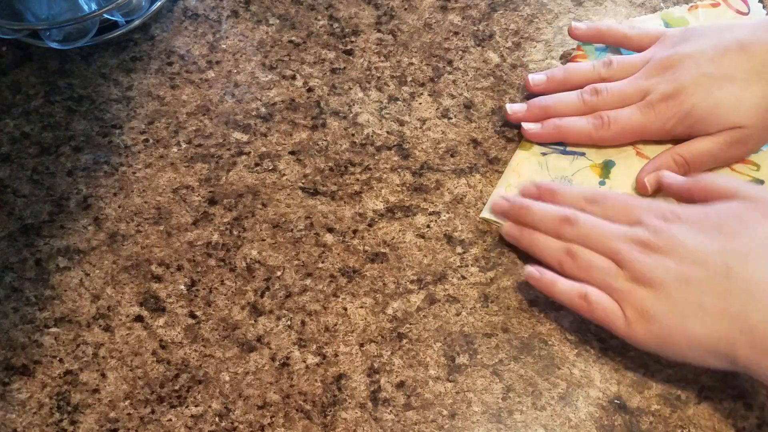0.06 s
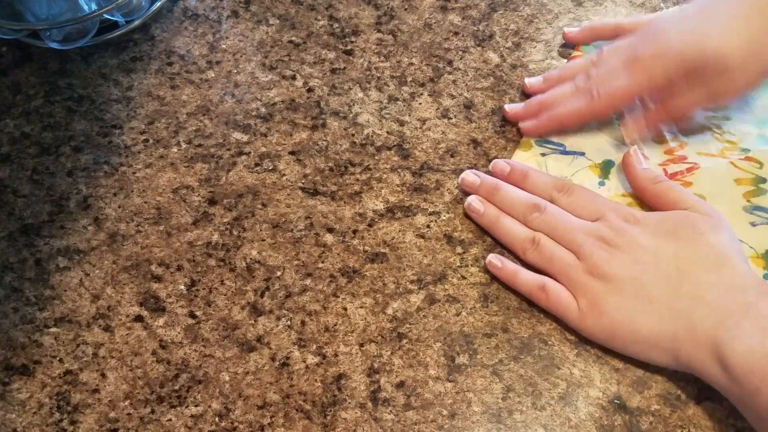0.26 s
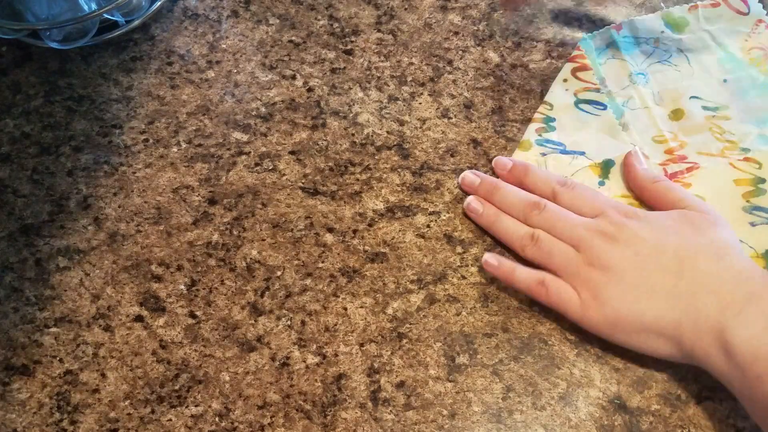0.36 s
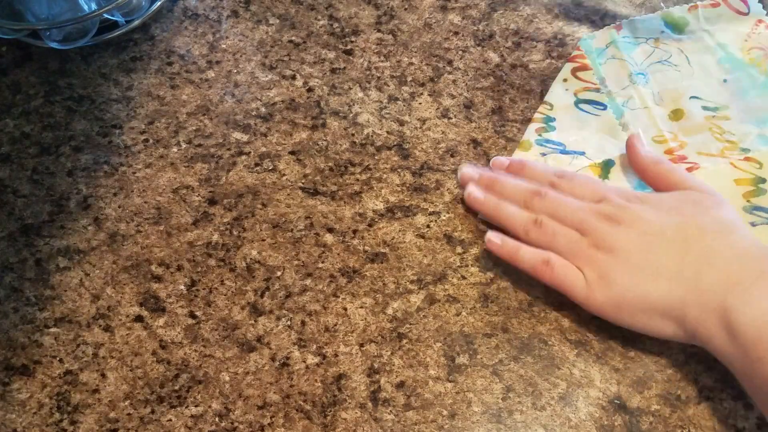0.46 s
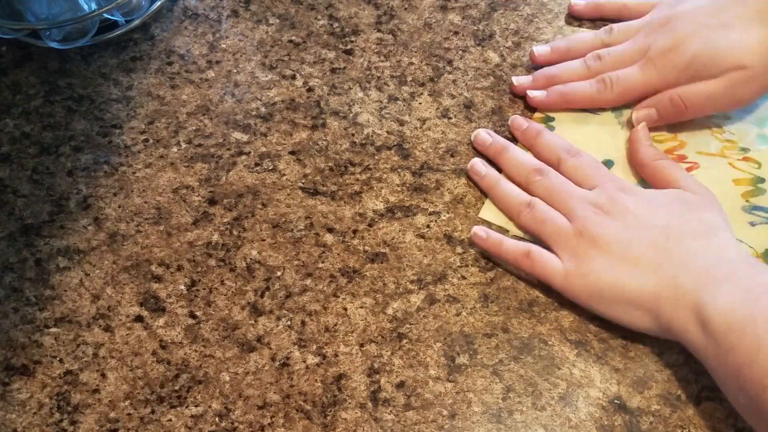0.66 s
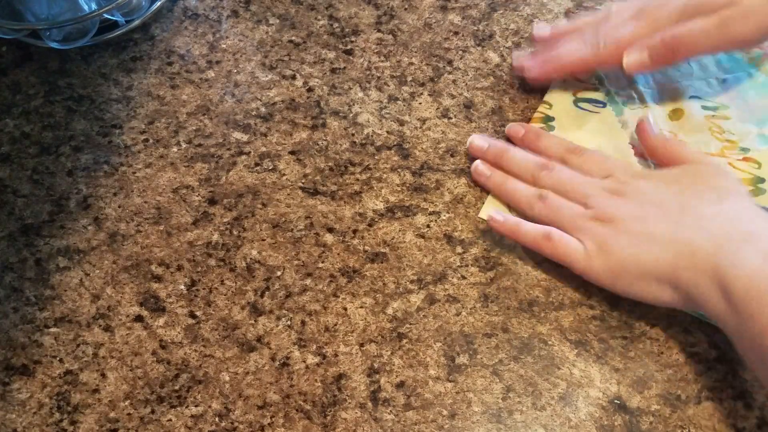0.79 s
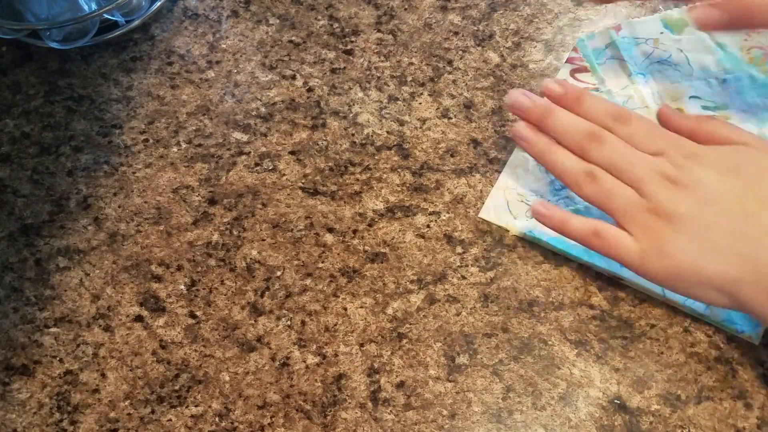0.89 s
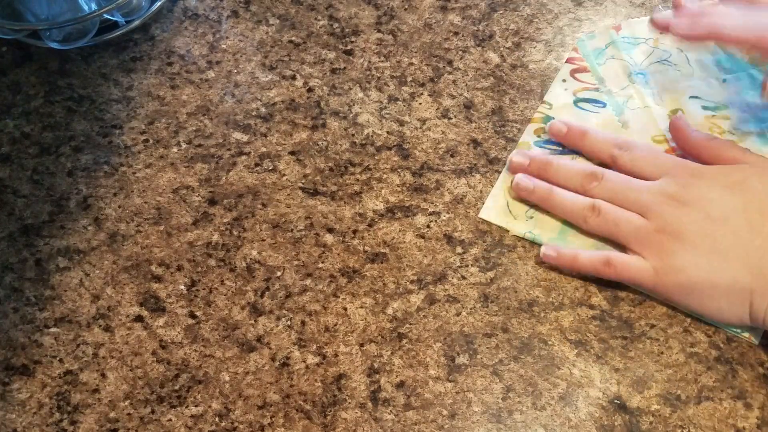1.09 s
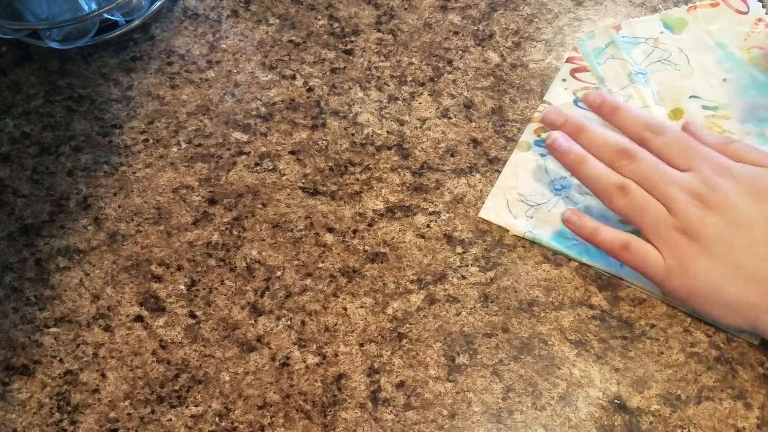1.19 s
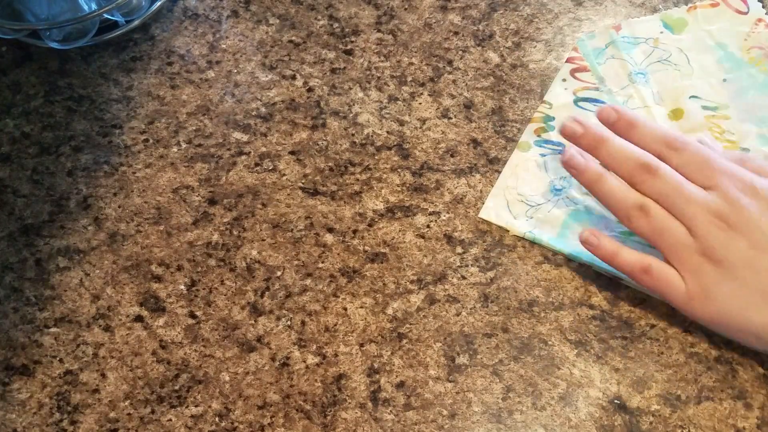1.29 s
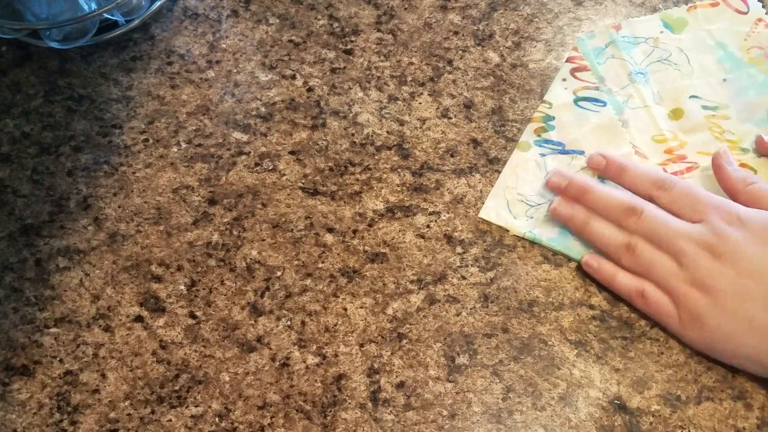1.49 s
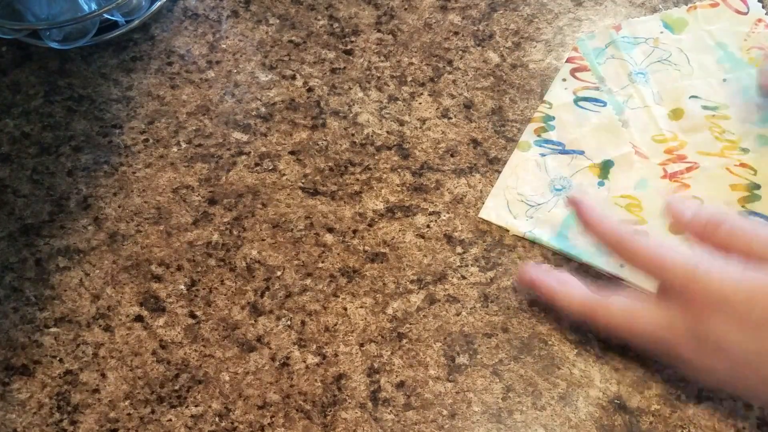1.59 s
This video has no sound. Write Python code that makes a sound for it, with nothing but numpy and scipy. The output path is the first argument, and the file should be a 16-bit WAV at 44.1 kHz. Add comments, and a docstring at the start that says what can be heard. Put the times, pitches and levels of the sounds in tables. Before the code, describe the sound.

A stiff waxed cloth crinkles as hands pat it flat on a kitchen countertop. Four pats each give a short crackle and soft thump, the third firmest, with faint palm slides and ticks between. An appliance hums behind the close sounds.

```python
"""Two hands fold a stiff waxed cloth and pat it flat on a kitchen countertop.
An appliance hums in the small room throughout. First a palm slides and the wax ticks.
Pats follow near 0.2, 0.65, 1.0 and 1.4 s, each crushing the cloth in a short crinkle and thumping
the counter, with ticks and slides between. The third is firmest and carries a brief hollow tone.
A last slide and a fainter hollow tone come near 1.6 s."""
import sys
import numpy as np
from scipy import signal
from scipy.fft import rfft, irfft
from scipy.io import wavfile

SR = 44100
rng = np.random.default_rng(int(sys.argv[2]) if len(sys.argv) > 2 else 0)


def to_wav(sig):
    """Store sig (one row per channel, or 1-D mono) as 16-bit WAV at the path in sys.argv[1].

    Samples outside -1..1 are clipped; the rate is SR.
    """
    pcm = np.clip(np.atleast_2d(sig), -1, 1) * 32767
    pcm = np.round(pcm).astype(np.int16)
    wavfile.write(sys.argv[1], SR, pcm.T)  # frames by channels


N = 72765


def amp(db):
    """dB to gain."""
    return 10 ** (np.asarray(db) / 20)


def unit(x):
    """Scale to rms 1."""
    return x / np.sqrt(np.mean(x ** 2) + 1e-20)


def curve(points, hz):
    """Interpolate a table over log frequency."""
    points_hz, values = np.transpose(points)
    return np.interp(np.log(hz + 1), np.log(points_hz + 1), values)


def since(start_s):
    """Seconds since start_s, zero before."""
    return np.maximum(np.arange(N) / SR - start_s, 0)


def bins_hz():
    """Full-length FFT frequencies."""
    return np.fft.rfftfreq(N, 1 / SR)


def pan(db):
    """Stereo gains for an L-R level difference."""
    return amp(np.array([[db], [-db]]) / 2)


def colour(pair, spectrum_db, coherence):
    """Give two independent signals a spectrum and L/R coherence, at rms 1."""
    left, other = rfft(pair)
    shared = np.clip(curve(coherence, bins_hz()), -1, 1)
    right = shared * left + np.sqrt(1 - shared ** 2) * other
    return unit(irfft(np.array([left, right]) * amp(spectrum_db), N))


def tilt(db_per_oct):
    """Slope in dB about 2 kHz, flat below 500 Hz."""
    return db_per_oct * np.log2(np.maximum(bins_hz(), 500) / 2000)


# Room noise spectrum: f/Hz, density/dB
AIR_SPECTRUM = [(20, -47), (35, 1), (59, -5), (91, -5.5), (129, -2.5), (188, -5.5), (297, -12.5),
                (420, -11), (520, -14.5), (650, -19), (850, -21), (1200, -27), (1800, -28), (2700, -35),
                (4000, -40.5), (6200, -47), (8500, -52), (9200, -45.5), (15500, -42.5)]
# Room sound field: f/Hz, L/R coherence
ROOM_COHERENCE = [(30, 0.96), (140, 1), (300, 0.8), (600, 0.14), (2000, 0.05), (15000, 0.035)]

def air(level_db=-48.5):
    """Low rumble and faint hiss of the room."""
    noise = rng.standard_normal((2, N))
    return amp(level_db) * colour(noise, curve(AIR_SPECTRUM, bins_hz()), ROOM_COHERENCE)


# Appliance hum lines: f/Hz, level/dB
HUM_LINES = [(59.2, -57.5), (118.6, -49), (145.3, -56.5), (234, -74.5), (295.5, -59.5), (387.5, -60.5),
             (414, -67), (473.8, -63), (581.5, -70), (710.3, -72.5), (989, -76.5), (1222, -83.5),
             (1439, -81.5), (2088, -89)]

def appliance_hum(waver=0.25, waver_hz=8):
    """Lines waver in level and phase; the higher ones reach the two microphones out of step."""
    out = np.zeros((2, N))
    lowpass = np.exp(-(bins_hz() / waver_hz) ** 2)
    for hz, db in HUM_LINES:
        noise = rng.standard_normal((2, N))
        gain_drift, drift_rad = waver * unit(irfft(rfft(noise) * lowpass, N))
        apart_rad = np.arccos(curve(ROOM_COHERENCE, hz)) * rng.choice([-1, 1])
        phase = 2 * np.pi * (hz * since(0) + rng.random()) + drift_rad
        out += amp(db) * np.sqrt(2) * (1 + gain_drift) * np.cos(phase + [[apart_rad / 2], [-apart_rad / 2]])
    return out


# Room decay: f/Hz, t60/s
ROOM_T60 = [(100, 0.3), (1000, 0.2), (4000, 0.14), (14000, 0.14)]

def reverb(x, delay_s=0.001, rise_s=0.0012):
    """Short diffuse tail, each band dying at its own rate."""
    noise = colour(rng.standard_normal((2, N)), 0, ROOM_COHERENCE)
    hz, t, bands = signal.stft(noise, SR, nperseg=256)
    decay = amp(-60 * t / curve(ROOM_T60, hz)[:, None])
    _, tail = signal.istft(bands * decay, SR, nperseg=256)
    tail = tail[:, :N] * np.minimum(since(delay_s) / rise_s, 1)
    return signal.fftconvolve(x, tail / np.linalg.norm(tail[0]), axes=1)[:, :N]


# Cloth sound: f/Hz, L/R coherence
CLOTH_COHERENCE = [(150, 0.62), (600, 0.67), (1500, 0.47), (4000, 0.033), (15000, 0.034)]

def wax_grains(spectrum_db, rate_per_s=4000, spread_db=1):
    """Dense tiny cracks of uneven size, at rms 1."""
    size = amp(spread_db * np.minimum(rng.exponential(1, N), 4))
    fires = rng.random(N) < rate_per_s / SR
    return colour(size * fires * rng.standard_normal((2, N)), spectrum_db, CLOTH_COHERENCE)


# Palm strokes: centre t/s, half-width/s, level/dB, tilt/(dB/oct)
STROKES = [(0.011, 0.027, -54, -1.5), (0.086, 0.0095, -59.5, -1.5), (0.287, 0.063, -61.5, -5),
           (0.438, 0.0089, -56.5, -4), (0.498, 0.017, -59.5, 1), (0.568, 0.013, -55.5, -5),
           (0.73, 0.024, -59, -5), (0.797, 0.025, -58, -1.5), (1.045, 0.016, -55.5, -5),
           (1.134, 0.073, -62, -5), (1.207, .012, -59.5, 1), (1.249, 0.022, -59, -0.5),
           (1.38, .07, -63.5, -1), (1.442, 0.069, -63.5, -6.5), (1.555, 0.034, -61, -1.5)]
# Rubbing spectrum: f/Hz, density/dB
RUB_SPECTRUM = [(300, -7), (1000, -3), (2200, -2.5), (4500, -8), (7000, -14.5), (10000, -5), (16000, -3.5)]

def palm_slides():
    """Skin rubs on wax: fine grains under a smooth stroke."""
    out = np.zeros((2, N))
    for centre_s, half_s, db, db_per_oct in STROKES:
        stroke = np.exp(-((since(0) - centre_s) / half_s) ** 2)
        out += amp(db) * stroke * wax_grains(curve(RUB_SPECTRUM, bins_hz()) + tilt(db_per_oct))
    return out


# Hollow tones: t/s, level/dB, f/Hz, t60/s
HOLLOW_TONES = [(.981, -39, 1145, .07), (1.6225, -44.5, 905, .05)]

def hollow_tones(rise_s=0.0024):
    """Damped sines: one under the firmest pat, a fainter one later."""
    out = np.zeros((2, N))
    for start_s, db, hz, t60_s in HOLLOW_TONES:
        t = since(start_s)
        envelope = np.minimum(t / rise_s, 1) * amp(-60 * np.maximum(t - rise_s, 0) / t60_s)
        out += amp(db) * envelope * np.sin(2 * np.pi * hz * t)
    return out


# Crease snaps: t/s, level/dB, resonance f/Hz, treble/dB (only cuts apply), L-R/dB
CREASES = [(.083, -55, 1690, 2, 7), (.127, -41, 1530, -27, 0), (0.2142, -43.5, 3570, 9, -7),
           (.2175, -34.5, 1300, -7, -5), (.2708, -37, 1860, 0.5, -3), (0.439, -52.5, 2600, -5, 8),
           (.486, -56, 4000, 0, -7), (0.501, -39.5, 1480, -11, 2), (0.557, -46, 1600, -20, 14),
           (.568, -44, 2220, -13, -8), (0.6397, -32, 3430, -2, -2.5), (0.642, -38.5, 1310, 2, 12),
           (.6472, -30, 2700, 1, -0.5), (.659, -51, 1480, 0, 11), (0.6635, -43, 3170, 0, -10),
           (.762, -54, 2660, 0, 15), (0.9687, -33.5, 1480, -12, -0.5), (0.9818, -33.5, 1360, 1, 2),
           (.985, -33, 2340, 5, -5.5), (1.028, -46, 3350, -5, -3), (1.208, -46, 2000, 0, 2.5),
           (1.383, -36.5, 920, -24, 1), (1.393, -41.5, 1950, 6, 13), (1.404, -39.5, 1800, -6, 18.5)]
# Snap spectrum: f/Hz, density/dB
SNAP_SPECTRUM = [(200, -14), (700, -9), (1300, -1), (2500, -1), (4500, -6), (6500, -18), (10000, -16),
                 (16000, -20)]

def crease_snaps(rise_s=0.00045, fade_s=0.0012, peak_db=7.5, width_oct=0.33, shelf_hz=4170):
    """Each crease gives a very short crack with one broad resonance."""
    out = np.zeros((2, N))
    f = bins_hz()
    shelf = f ** 4 / (f ** 4 + shelf_hz ** 4)
    for start_s, db, hz, treble_db, pan_db in CREASES:
        t = since(start_s)
        envelope = (1 - np.exp(-t / rise_s)) * np.exp(-t / fade_s)
        burst = rfft(envelope * rng.standard_normal((2, N)))
        whitened = irfft(burst / abs(burst) ** 0.7, N)
        resonance_db = peak_db * np.exp(-0.5 * (np.log2((f + 1) / hz) / width_oct) ** 2)
        spectrum_db = curve(SNAP_SPECTRUM, f) + resonance_db + min(treble_db, 0) * shelf
        crack = colour(whitened, spectrum_db, CLOTH_COHERENCE)
        out += amp(db) * pan(pan_db) * np.sqrt(np.mean(envelope ** 2)) * crack
    return out


# Hand landings: t/s, level/dB, base f/Hz, base t60/s
LANDINGS = [(0.2131, -28, 146, 0.053), (0.2298, -27, 88.4, 0.094), (0.2381, -35, 94, 0.11),
            (0.277, -32, 145, 0.017), (0.57, -38.5, 84, 0.16), (0.6409, -21, 116, 0.063),
            (0.6655, -23, 113, 0.02), (0.709, -34, 119, 0.031), (0.9858, -16, 95.8, 0.085),
            (1.0468, -28.5, 107.3, 0.2), (1.415, -28.5, 120.4, 0.075), (1.474, -34, 117, 0.073)]
# Counter modes: f ratio, level/dB, t60 ratio
COUNTER_MODES = [(.72, -24, 1.9), (1.0, 0, 1.1), (1.598, -9.5, 1.25)]

def counter_thumps(push_s=0.0084, right_lag_s=0.0001, pan_db=0.7):
    """The soft hand loads the counter and sets its low modes ringing briefly."""
    out = np.zeros((2, N))
    for start_s, db, hz, t60_s in LANDINGS:
        t = np.array([since(start_s), since(start_s + right_lag_s)])
        load = np.sin(np.pi / 2 * np.minimum(t / push_s, 1)) ** 2
        for f_ratio, mode_db, t60_ratio in COUNTER_MODES:
            decay_db = -60 * np.maximum(t - push_s, 0) / (t60_s * t60_ratio)
            out += load * amp(db + mode_db + decay_db) * np.sin(2 * np.pi * hz * f_ratio * t)
    return pan(pan_db) * out


# Cloth crushes: t/s, rise/s, fade/s, level/dB, tilt/(dB/oct), L-R/dB
CRUSHES = [(0.21, 0.0045, 0.015, -43.5, 0.34, 2.5), (0.227, 0.0016, 0.04, -53.5, 1.6, 2),
           (.642, .007, 0.0092, -50.5, 4, 3), (0.656, 0.0028, 0.0061, -46, 3.5, -2),
           (0.971, 0.00033, 0.017, -39.5, -0.6, 0), (0.979, 0.011, 0.0033, -36.5, 0, -1),
           (1.381, 0.01, 0.011, -44.5, 0.5, -2), (1.399, 0.013, 0.011, -45.5, 1.5, -2.5)]
# Crinkle spectrum: f/Hz, density/dB
CRINKLE_SPECTRUM = [(150, 0.5), (450, 8.5), (750, -3), (1100, 1), (1750, -2.5), (2400, -5.5), (4200, -14.5),
                    (6800, -26), (10000, -19.5), (16000, -27.5)]

def cloth_crinkles():
    """Cracks swell as the hand closes on the cloth and die as it lies flat."""
    out = np.zeros((2, N))
    for start_s, rise_s, fade_s, db, db_per_oct, pan_db in CRUSHES:
        t = since(start_s)
        envelope = np.minimum(t / rise_s, 1) * np.exp(-np.maximum(t - rise_s, 0) / fade_s)
        cracks = wax_grains(curve(CRINKLE_SPECTRUM, bins_hz()) + tilt(db_per_oct))
        out += amp(db) * pan(pan_db) * envelope * cracks
    return out


def scene(cloth_reverb_db=-7, thump_reverb_db=-19):
    """Cloth and counter in the room, over hum and room noise."""
    cloth = cloth_crinkles() + crease_snaps() + palm_slides() + hollow_tones()
    thumps = counter_thumps()
    tails = amp(cloth_reverb_db) * reverb(cloth) + amp(thump_reverb_db) * reverb(thumps)
    return cloth + thumps + tails + appliance_hum() + air()


# Microphone balance: f/Hz, L-R/dB
MIC_BALANCE = [(200, 0), (1000, -1), (2000, -1.5), (4000, 1), (8000, 1), (13000, 1.5)]

def record(dry):
    """Two microphones: bass roll-off, slightly unequal colour, band limit."""
    low_cut_hz, high_cut_hz = 55, 15850
    f = bins_hz()
    side_db = curve(MIC_BALANCE, f) / 2
    highpass = f ** 2 / np.sqrt(f ** 4 + low_cut_hz ** 4)
    heard = irfft(rfft(dry) * highpass * amp([side_db, -side_db]), N)
    lowpass = signal.firwin(511, high_cut_hz, window=("kaiser", 9), fs=SR)
    return signal.oaconvolve(heard, lowpass[None], "same")


dry = scene()
out = record(dry)
to_wav(out)
```